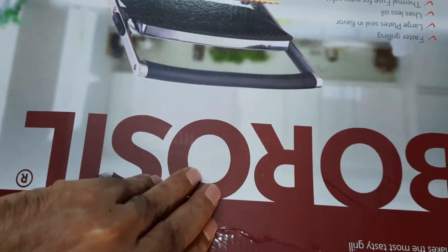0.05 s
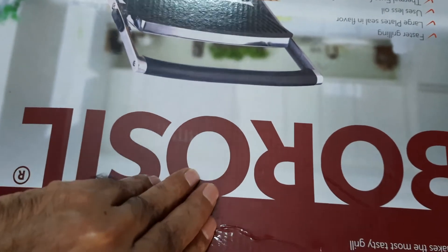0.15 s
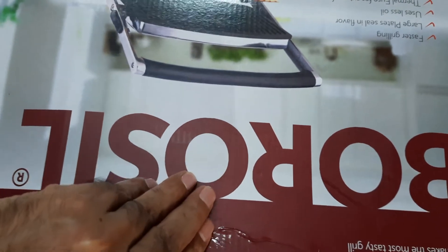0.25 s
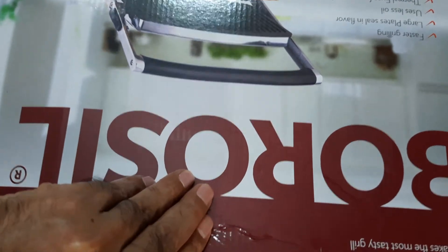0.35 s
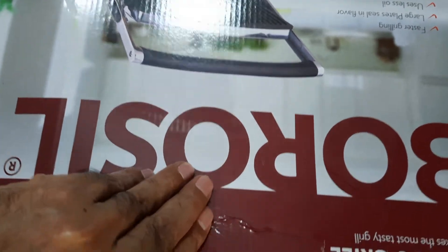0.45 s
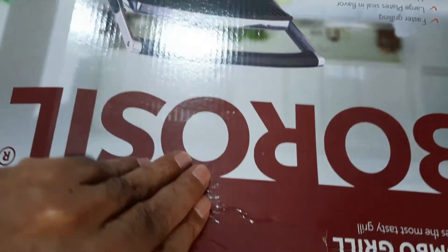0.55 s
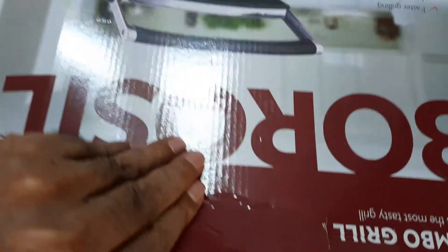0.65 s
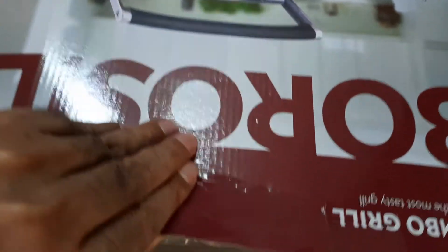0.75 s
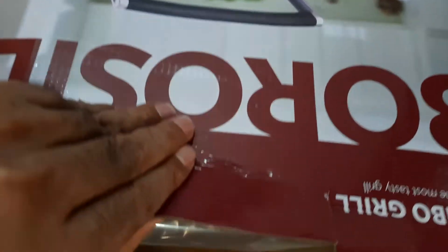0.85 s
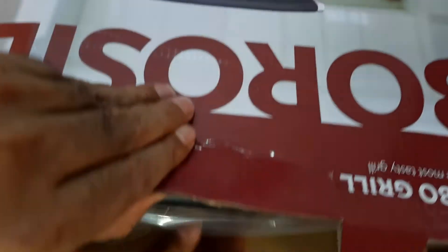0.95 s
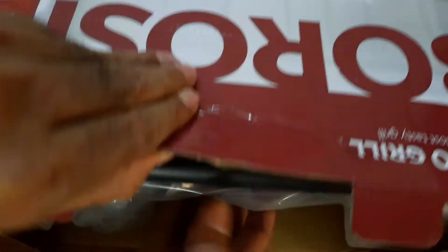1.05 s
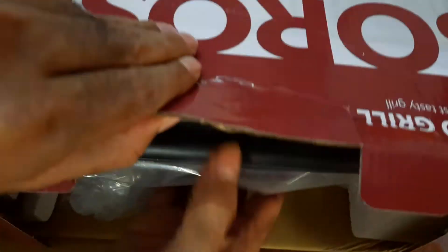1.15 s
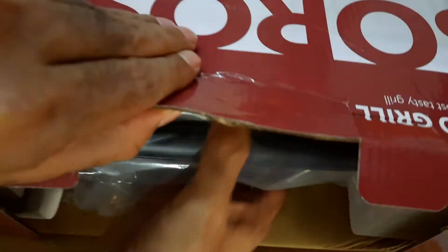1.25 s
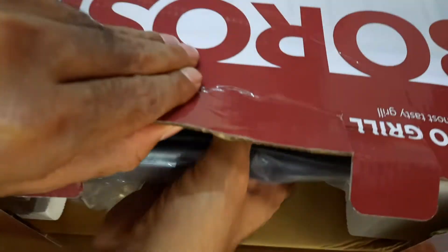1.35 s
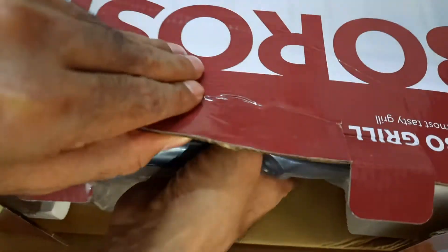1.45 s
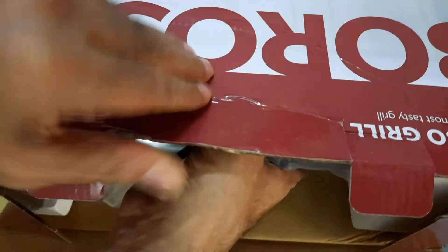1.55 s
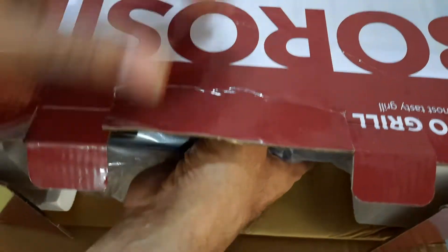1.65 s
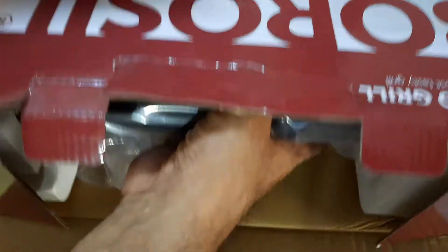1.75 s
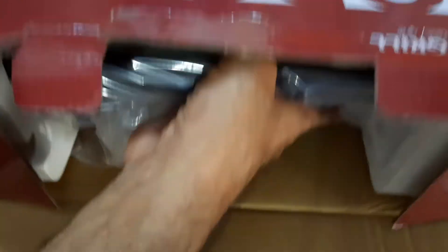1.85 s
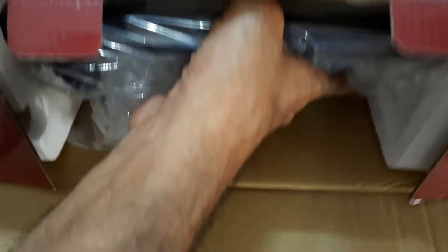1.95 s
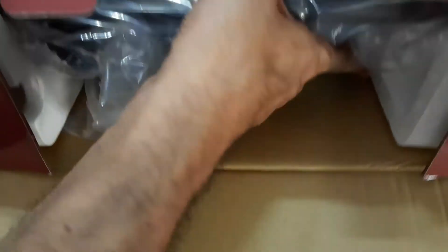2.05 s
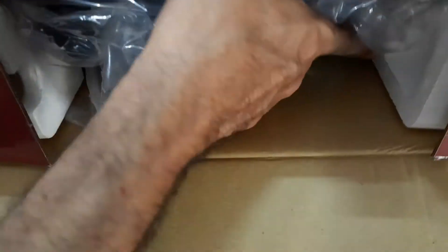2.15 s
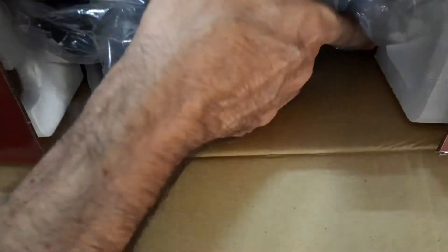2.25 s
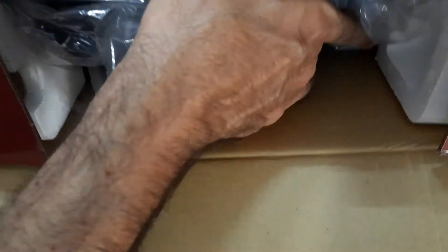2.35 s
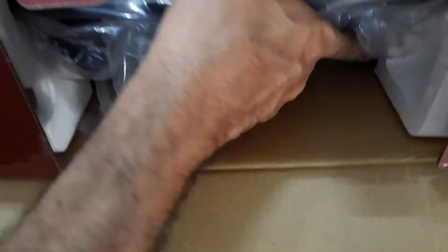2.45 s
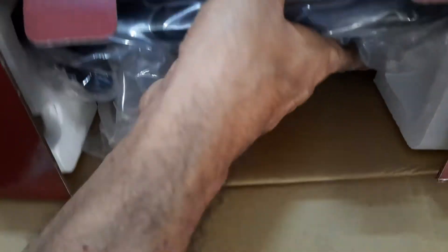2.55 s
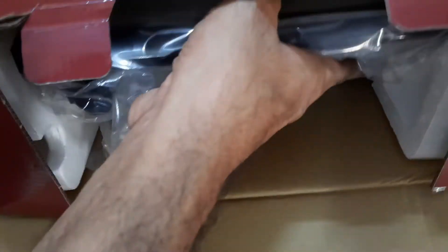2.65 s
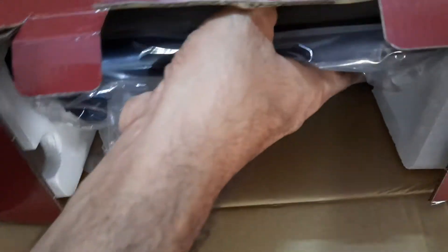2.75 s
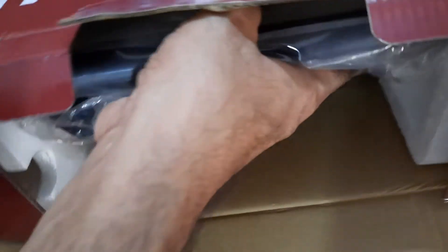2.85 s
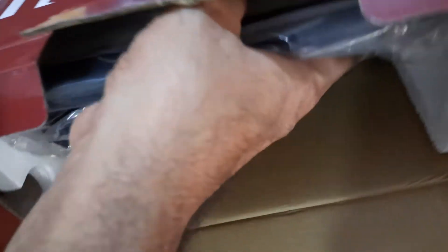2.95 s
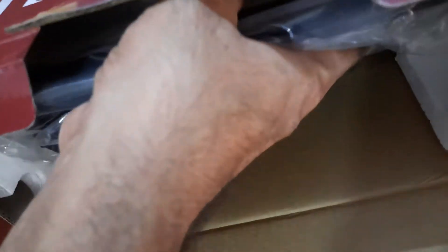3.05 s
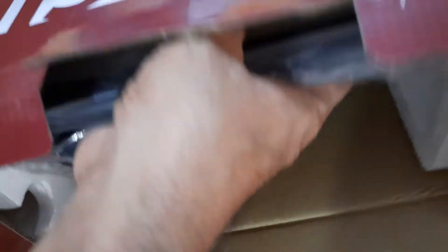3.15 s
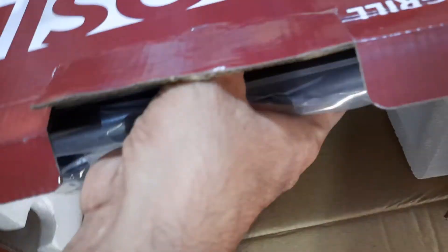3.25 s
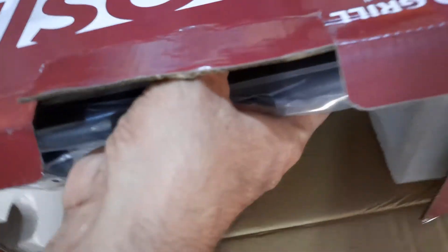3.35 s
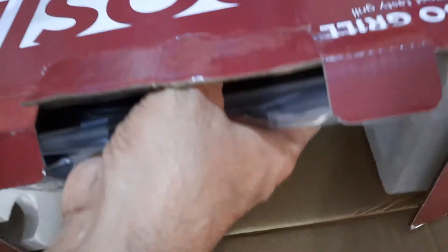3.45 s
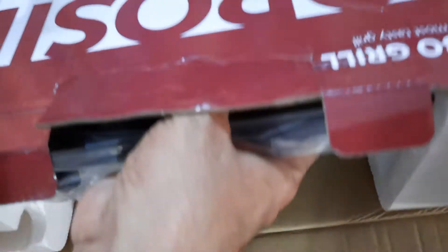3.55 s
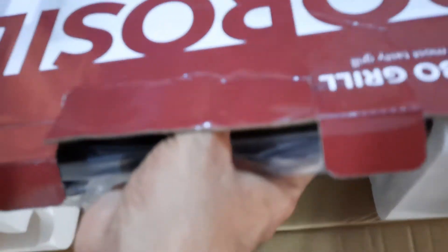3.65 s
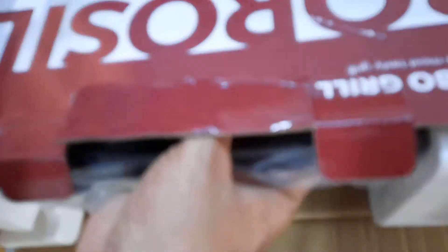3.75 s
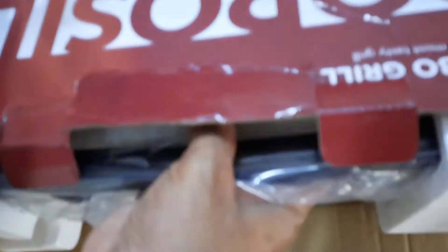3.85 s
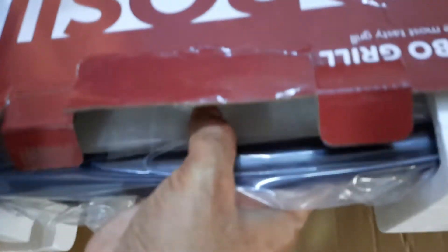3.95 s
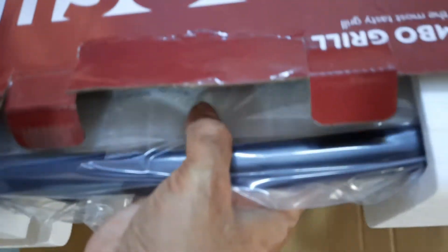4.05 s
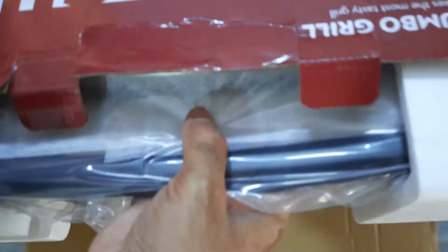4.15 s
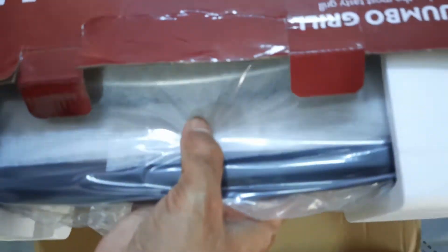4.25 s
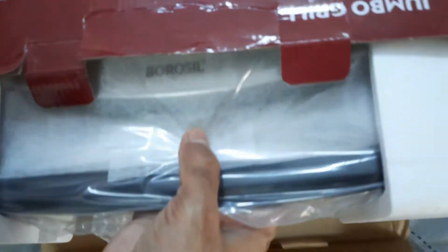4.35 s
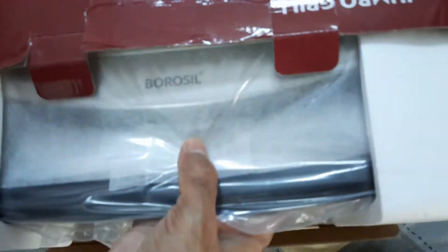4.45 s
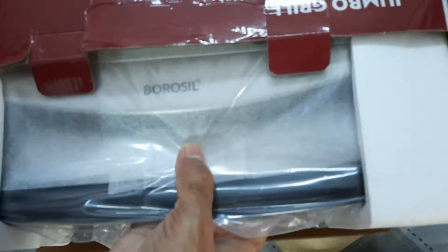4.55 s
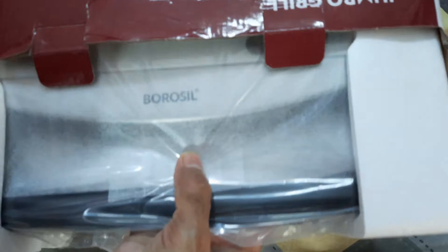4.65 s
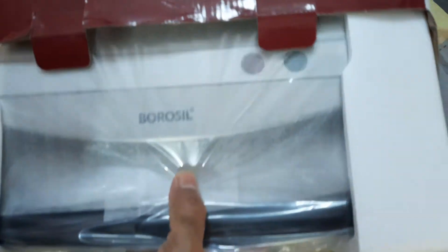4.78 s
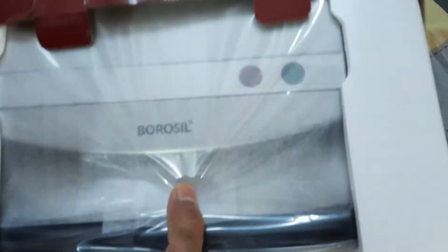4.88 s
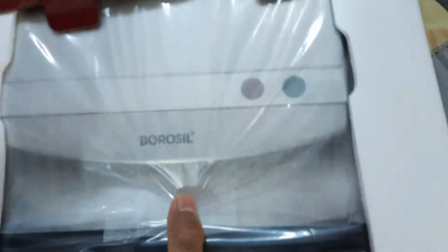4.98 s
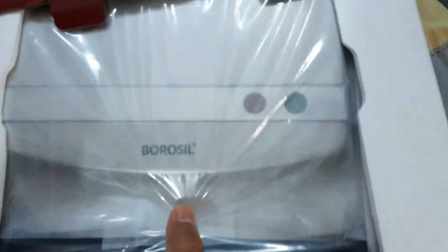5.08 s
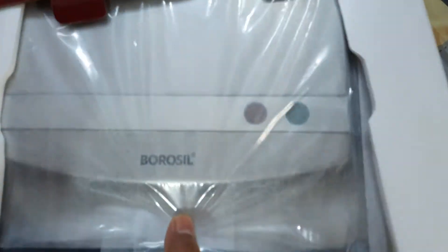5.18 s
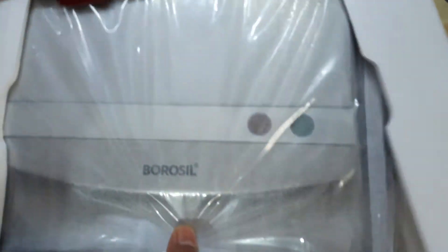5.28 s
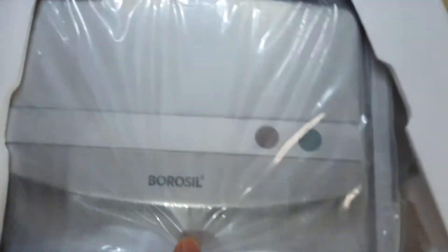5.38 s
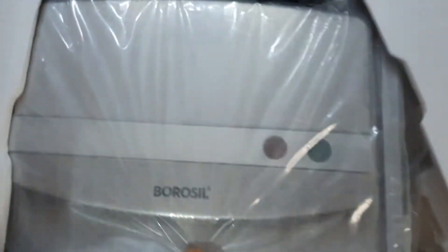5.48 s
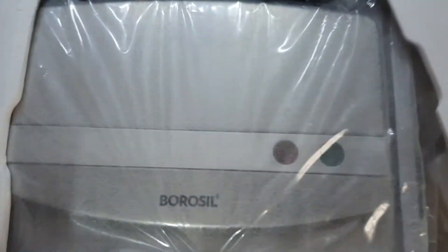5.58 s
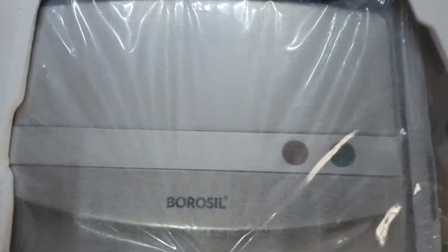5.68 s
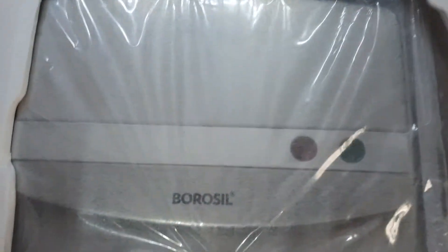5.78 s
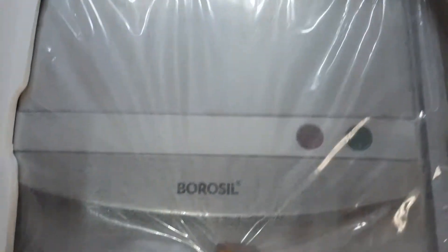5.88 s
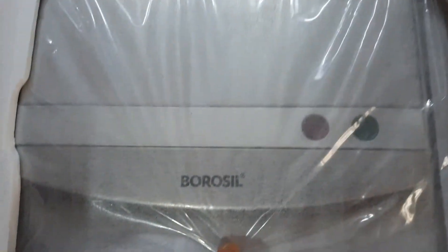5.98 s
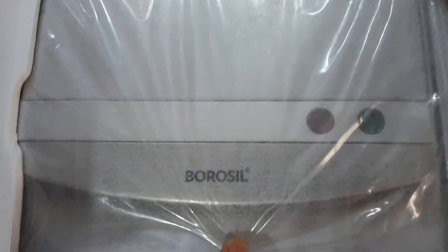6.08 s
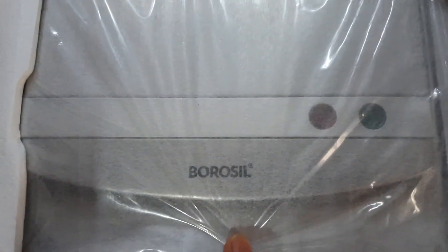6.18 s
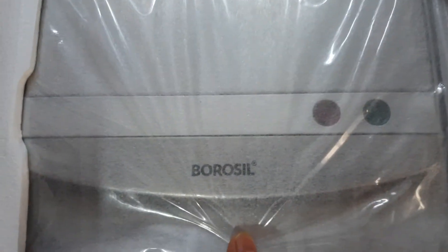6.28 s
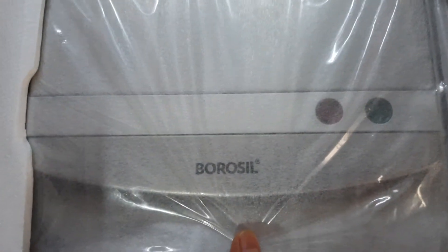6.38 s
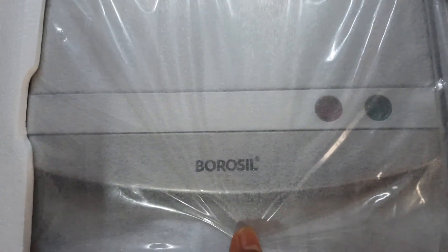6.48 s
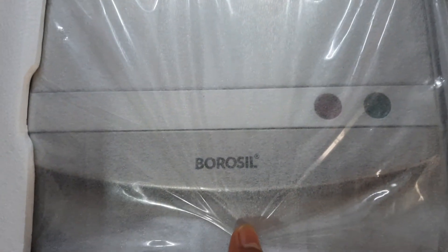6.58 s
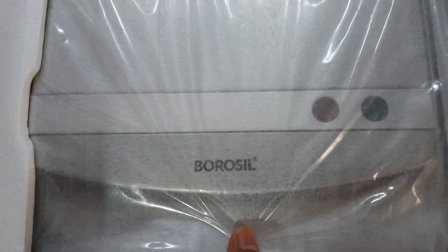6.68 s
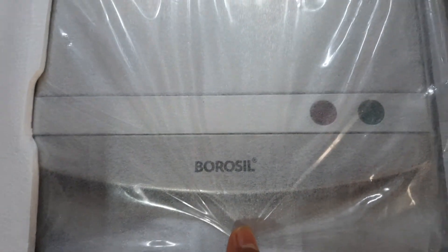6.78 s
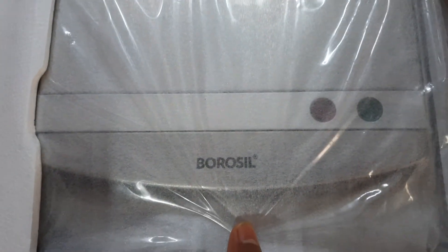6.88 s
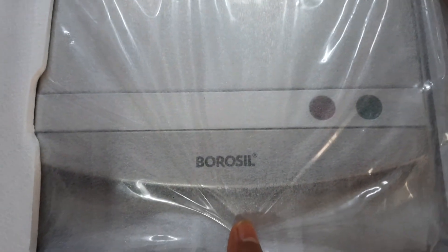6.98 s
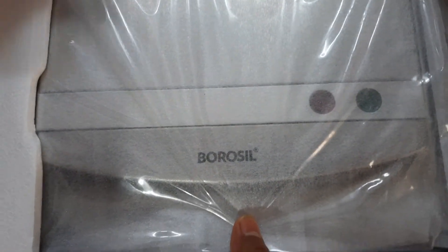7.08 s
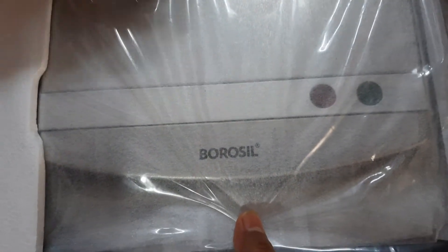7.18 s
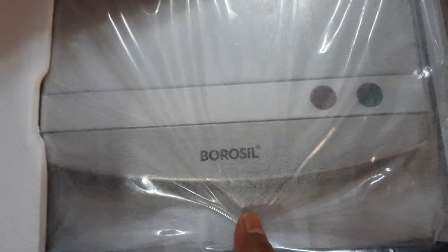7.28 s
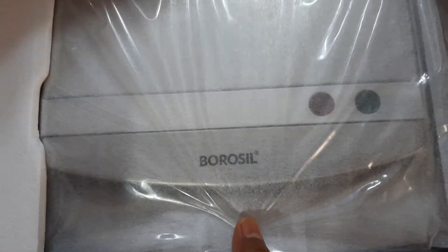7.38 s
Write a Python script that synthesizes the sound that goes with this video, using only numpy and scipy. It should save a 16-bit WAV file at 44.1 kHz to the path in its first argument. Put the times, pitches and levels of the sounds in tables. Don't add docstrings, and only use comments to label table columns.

```python
import sys
import numpy as np
from scipy import signal
from scipy.fft import rfft, irfft
from scipy.io import wavfile

SR = 44100
rng = np.random.default_rng(int(sys.argv[2]) if len(sys.argv) > 2 else 0)


def attenuation_scalar(level_db):
    decades = np.asarray(level_db, float) / 20
    return 10 ** decades


def store_pcm(level_fs):
    pcm = np.round(np.clip(level_fs, -1, 1) * 32767).astype(np.int16)
    wavfile.write(sys.argv[1], SR, np.atleast_2d(pcm).T)


N = 327213

# (frequency [Hz], width [Hz], level [dB])
BOX_MODES = [(182.5, 111, -2.5), (226, 73, 1), (296, 82, -4), (407, 101, -3), (555.5, 131, 3),
             (646, 166, 2.5)]
# (time [s], shake level [dB], hands left-right [dB])
HANDLING = [(0.0, -56.5, -2), (1.27, -50, -1), (1.41, -48.5, 2.5), (1.92, -51, -0.5), (2.14, -54.5, 0.5),
            (2.4, -48.5, 0), (2.78, -50, 0), (3.08, -56, 1), (4.4, -65, 0.5), (4.7, -56, 0),
            (5.52, -50.5, 0), (5.84, -67, 1.5), (5.972, -43.5, -4.5), (6.05, -47.5, -1), (6.232, -76.5, -5),
            (6.734, -58, 4), (7.096, -69, -14), (7.42, -72, -6)]


def rms_one(x):
    return x / np.sqrt(np.mean(x ** 2) + 1e-20)


def left_right(db):
    return attenuation_scalar(db / 2 * np.array([[1], [-1]]))


def in_time(rows):
    times_s, *columns = np.transpose(rows)
    return [np.interp(np.arange(N) / SR, times_s, column) for column in columns]


def at_hz(points):
    grid_hz = np.maximum(np.arange(N // 2 + 1) * SR / N, 1)
    table_hz, values = np.transpose(points)
    return np.interp(np.log(grid_hz), np.log(table_hz), values)


def drift(rate_hz):
    r = np.exp(-80 * np.pi * rate_hz / SR)
    slow = signal.lfilter([1], [1, -2 * r, r * r], rng.standard_normal(N // 40 + 2002))[2000:]
    return np.interp(np.arange(N) / 40, np.arange(len(slow)), rms_one(slow))


def resonance(x, hz, width_hz):
    r = np.exp(-np.pi * width_hz / SR)
    poles = [1, -2 * r * np.cos(2 * np.pi * hz / SR), r * r]
    return signal.lfilter([(1 - r * r) / 2, 0, (r * r - 1) / 2], poles, x)


def panels(x, modes):
    driven = 0
    for k, (hz, width_hz, db) in enumerate(modes):
        driven = driven + attenuation_scalar(db) * (-1) ** k * resonance(x, hz, width_hz)
    return rms_one(driven)


def pair_noise():
    # (frequency [Hz], left-right correlation [-1..1])
    likeness = [(60, 0.81), (250, 0.78), (600, 0.8), (1400, 0), (3100, 0), (15000, 0.0031)]
    mid, side = rfft(rng.standard_normal((2, N)))
    alike = np.clip(at_hz(likeness), -1, 1)
    return irfft(np.sqrt(1 + alike) * mid + np.sqrt(1 - alike) * side * [[1], [-1]], N)


def coloured(x, spectrum):
    closed = [(spectrum[0][0] / 2, -60), *spectrum, (spectrum[-1][0] * 2, -60)]
    return rms_one(irfft(rfft(x) * attenuation_scalar(at_hz(closed)), N))


def knocks():
    # (time [s], peak [dB], panel frequency [Hz], slap over ring [dB])
    blows = [(0.101, -30.5, 261, -18), (0.298, -32.5, 248, -22), (0.312, -22, 1620, -10),
             (0.315, -29.5, 780, -13), (0.32, -33, 242, 6), (0.552, -32, 240, -36),
             (0.682, -29.5, 206, -10), (0.716, -35.5, 530, -22), (0.8235, -12, 530, -14),
             (0.836, -38, 300, -15), (0.866, -36, 457, -11), (1.017, -41, 380, 0), (1.051, -36.5, 226, -22),
             (1.189, -33, 253, 5.5), (1.254, -28.5, 403, -8), (1.3092, -20, 290, -17),
             (1.31, -23, 680, -16), (1.403, -28.5, 180, -1), (1.442, -31.5, 453, -8),
             (1.545, -36, 614, -14), (1.655, -34.5, 235, -23), (1.574, -43, 615, -1),
             (1.789, -20, 548, -6.5), (2.081, -34, 680, 0), (2.112, -38, 786, 2), (2.126, -30.5, 550, -10),
             (2.153, -41, 890, -14), (2.312, -45, 222, 7), (2.402, -49, 744, 1), (2.446, -26, 226, -4),
             (2.667, -30.5, 530, 2), (2.872, -33.5, 480, -6), (2.967, -35.5, 573, -8),
             (3.042, -56, 470, -13), (3.163, -47, 653, -3), (3.673, -35.5, 620, 1), (4.658, -37, 268, -20),
             (5.006, -36.5, 296, -6), (5.966, -33, 935, -11), (5.9705, -28, 213, -9),
             (5.971, -27, 448, -10), (5.993, -35, 205, -10), (6.385, -57.5, 333, -5),
             (6.425, -60, 239, -10), (1.2675, -32, 700, -14), (5.9655, -34, 2350, -20),
             (5.945, -48, 810, 2), (7.1945, -60, 1720, -25)]
    ring_t60_s = 0.041
    damping_per_db, damping_per_octave = 0.08, 0.47
    out, t = np.zeros(N), np.arange(6000) / SR
    rise = 1 - np.exp(-t / 0.0015)
    skin = signal.butter(4, [650, 1500], "band", fs=SR, output="sos")
    for s, peak_db, hz, slap_db in blows:
        t60_s = ring_t60_s * np.exp(-damping_per_db * (peak_db + 32.5)) * (hz / 300) ** -damping_per_octave
        ring = np.sin(2 * np.pi * hz * t) * attenuation_scalar(-60 * t / t60_s)
        octaves_off = np.abs(np.log2(np.array(BOX_MODES)[:, 0] / hz))
        strengths_db = rng.normal(-15, 3, len(BOX_MODES)) - 8 * octaves_off
        for (mode_hz, width_hz, mode_db), strength_db in zip(BOX_MODES, strengths_db):
            decay = np.exp(-.5 * np.pi * width_hz * t)
            ring -= attenuation_scalar(mode_db + strength_db) * np.sin(2 * np.pi * mode_hz * t) * decay
        ring = rise * ring
        slap = signal.sosfilt(skin, rng.standard_normal(len(t)) * np.exp(-t / 0.006))
        knock = ring / np.abs(ring).max() + attenuation_scalar(slap_db) * slap / np.abs(slap).max()
        i = round(s * SR)
        out[i:i + len(t)] += attenuation_scalar(peak_db) * knock[:N - i]
    return out


def thumps():
    # (time [s], peak [dB], frequency [Hz])
    bumps = [(0.102, -51, 107), (0.364, -36, 83), (0.548, -49, 91), (0.682, -42.5, 104), (0.827, -33, 65),
             (1.076, -46, 79.6), (1.255, -37, 50.6), (1.319, -41, 61), (1.393, -37.5, 76.4),
             (1.3, -43, 110), (1.787, -39, 115), (1.795, -41, 58), (2.45, -46, 96), (2.669, -53, 70.0),
             (2.929, -58, 51.1), (3.199, -54, 77), (4.33, -48, 70.4), (4.41, -57, 75), (3.33, -57, 70),
             (5.661, -54, 142), (6.69, -55, 80.5), (6.78, -58, 80)]
    out, t = np.zeros(N), np.arange(6000) / SR
    swell = (t / 0.013) * np.exp(1 - t / 0.0084)
    for s, db, hz in bumps:
        i = round(s * SR)
        out[i:i + len(t)] += attenuation_scalar(db + 5.5) * np.sin(2 * np.pi * hz * t) * swell
    return out


def snaps():
    # (time [s], level [dB], centre [Hz], dull push [dB])
    crease_snaps = [(0.686, -32.5, 6400, -23), (0.689, -35.5, 5000, -16), (0.73, -30, 6600, -6.5),
                    (1.0076, -44, 3370, 5), (1.029, -42, 3600, -17), (1.1019, -28, 2930, -14),
                    (1.134, -31.5, 5470, -3), (1.1577, -34, 4670, -21), (1.1712, -26, 5700, -10),
                    (1.193, -19.5, 4600, -5.5), (1.2222, -26, 3900, -5), (1.2543, -38, 4200, 1),
                    (1.303, -29.5, 6160, -16), (1.336, -38, 4300, -8), (1.3446, -34, 5400, -14),
                    (1.353, -25.5, 6750, -3.5), (1.368, -36, 4400, 5), (1.3894, -28, 4380, -0.5),
                    (1.394, -33, 4450, -2.5), (1.3982, -27.5, 4350, -21), (1.466, -34, 4100, -19),
                    (1.5483, -30, 4800, 1), (1.574, -28.5, 4670, 0.5), (1.586, -34, 4400, -7),
                    (1.618, -38, 5000, -9), (1.657, -29.5, 5100, -5), (1.69, -33, 4900, -19),
                    (1.6936, -32, 4200, -1), (1.738, -39.5, 4200, -16),
                    (1.7762, -18.5, 4900, -11), (1.808, -32, 3850, -8), (1.8526, -25.5, 5200, -6),
                   (1.8674, -32.5, 5600, 1), (1.8785, -40.5, 4900, 8), (1.924, -43, 4800, 8),
                   (1.963, -34.5, 4700, -6), (1.989, -28.5, 4850, -17), (2.0042, -29, 3300, -2.5),
                   (2.039, -34, 4860, -8), (2.0683, -35.5, 3920, 0), (2.0975, -33.5, 3700, -4),
                   (2.109, -24.5, 6440, -26), (2.1267, -27, 4700, -22), (2.131, -13.5, 3770, -24),
                   (2.1562, -32.5, 4500, -3), (2.2668, -33, 3040, -11), (2.272, -39, 3700, -8),
                   (2.3146, -26, 6760, -13), (2.3697, -37, 4900, -4), (2.38, -33.5, 4130, -29),
                   (2.4066, -39, 4700, 4), (2.417, -26.5, 4370, -9), (2.4328, -23.5, 6500, -4.5),
                   (2.4435, -20, 3280, -20), (2.4612, -46, 8000, 9), (2.481, -31, 6100, -22),
                    (2.51, -21, 9050, -11), (2.5229, -21, 8050, -13), (2.532, -19, 5270, -18),
                  (2.541, -31, 5100, -14), (2.5586, -32, 4400, -5), (2.6247, -29, 4900, -19),
                  (2.6538, -37.5, 4560, 3), (2.678, -28.5, 4030, -3.5), (2.728, -35.5, 3900, 5),
                  (2.7484, -26, 5370, -9), (2.7693, -22.5, 5660, -6.5), (2.7815, -22, 5930, -10.5),
                  (2.7853, -31, 5300, -16), (2.8504, -33.5, 6400, -7), (2.9013, -39, 2680, 4.5),
                  (2.912, -37, 4600, -17), (2.93, -27.5, 4120, -13), (2.938, -30, 6030, -6),
                  (2.9903, -37, 4500, -5), (2.9996, -36, 5000, -17), (3.046, -38.5, 4060, -2.5),
                  (3.132, -51, 4430, -23), (3.161, -46, 4660, -0.5), (3.2085, -52, 3100, 9),
                  (3.345, -28.5, 5400, -10), (3.361, -29.5, 2220, -0.5), (3.4136, -26, 5170, -32),
                  (3.504, -27, 4970, -13), (3.6, -33, 4500, -10),
                    (1.2115, -31, 6000, -4), (1.2675, -54, 2500, 5), (1.2975, -47, 2300, 0),
                   (1.4218, -37.5, 7000, 8), (1.4418, -35, 2880, 2), (1.5095, -42, 4940, 1),
                   (1.529, -49, 5440, -6), (1.717, -36, 4500, 2.5), (1.727, -40, 5500, -1),
                   (1.762, -33, 6800, -7), (1.840, -39, 7650, -14), (1.897, -45, 3000, 6),
                   (1.938, -37, 5000, 5), (2.0165, -36, 7000, 0), (2.0255, -37, 7000, -5),
                   (2.082, -38, 5500, 5), (2.203, -44, 2400, -8), (2.3202, -38, 3500, -1),
                   (2.403, -35.5, 2500, 5.5), (2.4475, -32, 2800, -5), (2.4526, -34, 2600, 6),
                   (2.636, -44, 4500, 1), (2.697, -38, 4500, 6.5), (2.7512, -34, 6500, -14),
                   (2.3745, -41, 5400, 1), (2.5255, -26, 3500, -7), (2.5847, -32.5, 6000, 0.5),
                   (2.670, -43, 7000, -10), (2.7165, -43, 6430, 1), (2.885, -47.5, 3500, 11),
                   (3.052, -45, 2530, -8), (3.2435, -66, 2430, 0), (3.3095, -50, 7700, -2),
                   (3.3325, -42, 2400, 6.5), (1.2865, -47, 4900, -8), (1.1825, -39, 4000, 0),
                   (2.311, -40, 2500, 1), (2.4675, -38, 9000, -12), (2.4945, -38, 7000, -8),
                    (0.1, -40.5, 6400, -17), (0.826, -42, 12000, -29), (0.141, -57, 6800, -15),
                  (0.2014, -49.5, 7940, -17), (0.492, -57, 3800, 5), (0.605, -51, 7100, -12),
                  (0.6544, -49.5, 3200, 10), (0.9675, -60, 7200, -5.5), (6.345, -59, 5000, -7),
                  (5.132, -35.5, 6000, -17), (5.465, -33, 8160, -20), (5.9655, -37.5, 2360, 5),
                  (6.021, -52, 6200, -20), (6.89, -50, 6800, -17), (7.022, -47.5, 3850, -8.5),
                  (7.147, -52.5, 4800, -13), (7.22, -59, 7000, -20), (7.1937, -34.5, 8150, -33)]
    peel_times = [1.193, 1.2115, 1.303, 1.7764, 2.4068, 2.417, 2.4327, 2.4436, 2.481, 2.3146]
    peel_s = 0.0016
    port_lag_samples, alike = 3, 0.6
    out, t = np.zeros((2, N)), np.arange(-130, 900) / SR
    after = np.maximum(t, 0)
    creak = 0.02 * np.exp(np.minimum(t, 0) / 0.0013)
    tick_and_rattle = np.exp(-after / 0.00043) + 0.37 * np.exp(-(after / 0.0024) ** 2)
    sudden = np.where(t < 0, creak, tick_and_rattle)
    swell = np.exp(-((t - .001) / peel_s) ** 2) + .1 * np.exp(-np.abs(t) / .004)
    dull = signal.butter(2, [500, 2200], "band", fs=SR, output="sos")
    push_shape = (t > 0) * np.exp(-after / 0.0046)
    for s, db, hz, dull_db in crease_snaps:
        pan_db = np.interp(s, *np.transpose(HANDLING)[::2]) + rng.normal(1.0, 2.8)
        shape = swell if np.abs(s - np.array(peel_times)).min() < .003 else sudden
        top_hz = np.clip(12500 + 400 * (db + 20), 6500, 15000)
        bright = signal.butter(1, [.45 * hz, top_hz], "band", fs=SR, output="sos")
        near, other = rng.standard_normal((2, len(t)))
        far = alike * np.roll(near, port_lag_samples) + np.sqrt(1 - alike ** 2) * other
        noise = np.array([near, far])
        tick = signal.sosfilt(bright, noise * shape) + 2.0 * resonance(noise * shape, hz, 0.3 * hz)
        push = signal.sosfilt(dull, (noise + 2.0 * noise[::-1]) * push_shape)
        snap = rms_one(tick) + attenuation_scalar(dull_db - 1.0) * rms_one(push)
        i = round((s + t[0]) * SR)
        out[:, i:i + len(t)] += (attenuation_scalar(db - 11.5) * left_right(pan_db) * snap)[:, :N - i]
    return out


def friction_db():
    # (time [s], hiss [dB], card scrape over hiss [dB])
    brushes = [(0.0, -53, 9.5), (.06, -61, 4), (.12, -62, 6), (.207, -67, 0), (0.313, -38, 5.5),
               (0.527, -56.5, -1), (0.611, -57, -4), (.66, -58.5, 3), (.692, -53, 3), (0.737, -41, -12),
               (.79, -58, -21), (.835, -49.5, -26), (.875, -57, -16), (.975, -64, -3), (1.02, -52, 0),
               (3.13, -65, 4), (3.204, -59.5, 10), (3.25, -83, 3), (3.32, -57, 5.5), (3.362, -51.5, 8.5),
               (5.978, -46.5, -1), (5.92, -54.5, -15), (6.03, -53, 2), (6.08, -56.5, -0.5),
               (6.2, -66.5, -1.5), (6.38, -76, -3), (6.425, -61.5, -9), (6.47, -59.5, -12),
               (6.945, -58, -11), (6.985, -59.5, -19), (7.36, -72, -19.5), (7.06, -69.5, -7),
               (7.2, -61, -7)]
    # (up to speed [s], length [s], hiss [dB], end hiss [dB], card scrape over hiss [dB])
    slides = [(3.503, 0.29, -39, -50.5, 1), (3.78, 0.097, -35, -34.5, -18), (3.8, 0.63, -31.5, -34.5, -11),
              (4.46, 0.14, -37.5, -43, -6.5), (4.67, 0.34, -32, -29.5, -15.5), (3.639, 2.09, -51, -60, 10),
              (5.5, 0.075, -50, -41.5, -22), (5.235, 0.38, -37.5, -42.5, -8.5),
              (5.62, 0.088, -44.5, -44, -24), (6.85, 0.1, -70, -61.5, -5),
              (6.69, 0.072, -35.5, -35.5, -10.5)]
    # (time [s], hiss [dB])
    groping = [(1.04, -54.5), (1.165, -51), (1.36, -44), (1.49, -49), (1.58, -45.5), (1.97, -47.5),
               (2.16, -52), (2.25, -54), (2.32, -54), (2.395, -60), (2.41, -42.5), (2.55, -45),
               (2.8, -52.5), (2.95, -56.5), (3.035, -64.5), (3.05, -57), (3.07, -54.5), (3.09, -72)]
    groping_scrape_db, still_db = 2.5, -74.5
    rise_db_per_s, fall_db_per_s, slide_fall_db_per_s = 351.5, 217, 200
    speed_up_s, speed_power = 0.17, 1.53
    t = np.arange(N) / SR
    groping_db, = in_time(groping)
    outside_s = np.maximum(0, np.maximum(groping[0][0] - t, t - groping[-1][0]))
    strokes = [(groping_db - fall_db_per_s * outside_s, groping_scrape_db)]
    for s, db, card_db in brushes:
        drop_db = np.where(t < s, rise_db_per_s * (s - t), fall_db_per_s * (t - s))
        strokes.append((db - drop_db, card_db))
    for s, length_s, db, end_db, card_db in slides:
        speed = np.clip(1 + (t - s) / speed_up_s, 1e-4, 1)
        fall_db = slide_fall_db_per_s * np.maximum(t - s - length_s, 0)
        steady_db = np.interp(t, [s, s + length_s], [db, end_db])
        strokes.append((steady_db + speed_power * 20 * np.log10(speed) - fall_db, card_db))
    hiss = attenuation_scalar(still_db) ** 2 + sum(attenuation_scalar(db) ** 2 for db, _ in strokes)
    scrape = sum(attenuation_scalar(db + card_db) ** 2 for db, card_db in strokes)
    return 10 * np.log10(hiss), 10 * np.log10(scrape + 1e-10)


def crinkle(share, per_s, spread_db, burst_s):
    sizes = attenuation_scalar(spread_db * np.minimum(rng.exponential(1, N), 2.5))
    slips = sizes * (rng.random(N) < per_s * attenuation_scalar(3.5 * drift(15)) / SR)
    bursts = rms_one(signal.lfilter([1], [1, -np.exp(-1 / (burst_s * SR))], slips))
    share = np.clip(share, 0, 1)
    return np.sqrt(1 - share + share * bursts ** 2)


def film_hiss(share):
    # (frequency [Hz], density [dB/Hz])
    hiss_spectrum = [(2000, -21), (2500, -11.5), (3350, -8.5), (5500, -3.5), (7000, -8), (9300, -16.5),
                     (12900, -10.5), (16000, -11)]
    # (low [Hz], high [Hz])
    film_bands = [(1000, 3000), (3000, 5500), (5500, 9500), (9500, 20000)]
    # (frequency [Hz], width [Hz], gain [dB])
    foam_modes = [(4900, 2750, -3.5), (13700, 5900, 4), (1330, 200, -1)]
    # (deepest at [s], frequency [Hz], width [Hz], gain [dB])
    hollow = [
        (3.9, 3350, 700, -6),
        (4.6, 3350, 700, -15),
        (5.4, 3480, 700, -3),
        (6.7, 3570, 900, -2.5),
    ]
    # (highest at [s], frequency [Hz], width [Hz], gain [dB])
    ridge = [
        (3.9, 2750, 400, 4),
        (4.6, 2400, 350, 8.5),
        (5.4, 2400, 400, 0),
    ]
    white = [coloured(pair_noise(), hiss_spectrum) for _ in range(2)]
    together = crinkle(0.98 * share, per_s=270, spread_db=6.5, burst_s=0.0012)
    out = 0
    for k, edges_hz in enumerate(film_bands):
        band = signal.sosfilt(signal.butter(2, edges_hz, "band", fs=SR, output="sos"), white[k % 2])
        own = crinkle(0.26 * share, per_s=210, spread_db=1.5, burst_s=0.0022)
        out = out + band * together * own * attenuation_scalar((0.8 + 2.4 * share) * drift(14))
    top = signal.sosfilt(signal.butter(2, 9500, "high", fs=SR, output="sos"), out)
    out = out - np.clip(3.7 * share, 0, .72) * top
    sliding = np.clip(1 - 4 * share, 0, 1)
    for moving in (hollow, ridge):
        times_s = np.array(moving)[:, 0]
        for (_, hz, width_hz, db), here in zip(moving, np.eye(len(moving))):
            depth = np.interp(np.arange(N) / SR, times_s, here)
            out = out + sliding * depth * (attenuation_scalar(db) - 1) * resonance(out, hz, width_hz)
    for hz, width_hz, db in foam_modes:
        out = out + sliding * (attenuation_scalar(db) - 1) * resonance(out, hz, width_hz)
    return out


def rubbing():
    # (time [s], share [0-1])
    crinkle_share = [
        (0, 0.26),
        (0.92, 0.07),
        (1.05, 0.82),
        (3.0, 0.74),
        (3.38, 0.93),
        (3.44, 0.05),
        (7.42, 0.06),
    ]
    # (frequency [Hz], density [dB/Hz])
    scrape_spectrum = [(600, -28), (850, -9.5), (1150, -2), (1850, -3), (2450, -2), (3200, -10),
                       (4500, -12)]
    # (frequency [Hz], density [dB/Hz])
    shut_spectrum = [(500, -28), (750, -11), (1250, -13), (1620, -2), (2050, 1), (2500, -3), (3600, -13.5)]
    # (frequency [Hz], density [dB/Hz])
    rumble_spectrum = [(25, -21.5), (45, -4.5), (70, 8), (110, -0.5), (160, -3.5), (250, 9)]
    opens_s = 0.66
    hiss_db, scrape_db = friction_db()
    share, = in_time(crinkle_share)
    boom_db, pan_db = in_time(HANDLING)
    flap_db = scrape_db - 15 + 17 * share
    rumble_db = -65.5 + (boom_db + 54.5)
    rub = pair_noise() * crinkle(share, per_s=300, spread_db=4.0, burst_s=0.0021)
    shut = np.arange(N) < opens_s * SR
    card = np.where(shut, coloured(rub, shut_spectrum), coloured(rub, scrape_spectrum))
    hiss = attenuation_scalar(hiss_db) * film_hiss(share)
    scrape = attenuation_scalar(scrape_db + 0.6 * drift(17)) * card
    flaps = attenuation_scalar(flap_db + 2.5 * drift(10)) * panels(rub, BOX_MODES[3:])
    boom = attenuation_scalar(boom_db + 3.0 * drift(14)) * panels(pair_noise(), BOX_MODES[:3])
    rumble = attenuation_scalar(rumble_db + 1.5 * drift(4.6)) * coloured(pair_noise(), rumble_spectrum)
    return (hiss + scrape) * left_right(pan_db) + flaps + boom + rumble


def air_gap():
    # (time [s], resonance [Hz], level [dB])
    gap = [
        (3.3, 1220, -63),
        (3.338, 1126, -41),
        (3.796, 1194, -34.5),
        (4.128, 1164, -43.5),
        (4.6, 1445, -62),
    ]
    hz, db = in_time(gap)
    inside = np.interp(np.arange(N) / SR, [3.3, 3.45, 4.3, 4.6], [0, 1, 1, 0])
    lowpass = signal.butter(2, 150, fs=SR, output="sos")
    band = rms_one(signal.sosfilt(lowpass, rng.standard_normal((2, 2, N))))
    phase = 2 * np.pi * np.cumsum(hz) / SR
    return inside * attenuation_scalar(db - 7.5) * (band[0] * np.cos(phase) + band[1] * np.sin(phase))


def squeak():
    # (start [s], length [s], from [Hz], to [Hz], level [dB])
    settling = (6.31, 0.085, 4800, 5250, -75)
    s, length_s, from_hz, to_hz, db = settling
    done = np.clip((np.arange(N) / SR - s) / length_s, 0, 1)
    phase = 2 * np.pi * np.cumsum(from_hz + (to_hz - from_hz) * np.sqrt(done)) / SR
    return attenuation_scalar(db) * np.sqrt(np.sin(np.pi * done).clip(0)) * np.sin(phase)


def room(x, t60_s):
    t = np.arange(round(.3 * SR)) / SR
    tail = rng.standard_normal((2, len(t))) * attenuation_scalar(-60 * t / t60_s) * (1 - np.exp(-t / 0.0031))
    tail = signal.lfilter([1], [1, -.4], tail)
    return signal.fftconvolve(x, tail / np.sqrt(np.sum(tail ** 2) / 2), axes=1)[:, :N]


def room_tone():
    # (frequency [Hz], density [dB/Hz])
    tone_spectrum = [(24, -52.5), (40, -12), (81, 15), (180, -3), (220, 9.5), (372, -9.5), (873, -30),
                     (1590, -4), (2630, -22.5), (7930, -13.5), (16000, -59)]
    # (frequency [Hz], left-right [dB])
    room_side = [(2000, 0), (4500, -5), (8000, -4), (10500, -9), (16000, -7)]
    tone = attenuation_scalar(-65 + 2.8 * drift(4.6)) * coloured(pair_noise(), tone_spectrum)
    return irfft(rfft(tone) * left_right(at_hz(room_side)), N)


def scene():
    blows, creases = knocks(), snaps()
    blow_tail = room(attenuation_scalar(-12.5) * blows[None], t60_s=0.35)
    blow_tail = blow_tail + 0.58 * blow_tail[::-1]
    crease_tail = attenuation_scalar(-17) * room(creases, t60_s=.08)
    hits = blows + blow_tail + thumps() + creases + crease_tail
    return hits + rubbing() + air_gap() + squeak() + room_tone()


def roll_off(x):
    return signal.sosfilt(signal.butter(12, 16990, fs=SR, output="sos"), x)


def record(dry):
    # (frequency [Hz], width [Hz], gain [dB])
    port = (7870, 750, 8.46)
    # (frequency [Hz], left-right [dB])
    sidedness = [(60, 4), (2500, 3), (5200, -0.5), (6600, 1), (8200, 6.5), (10200, -10), (12400, -4.5),
                 (16000, 2)]
    hz, width_hz, db = port
    ported = dry + (attenuation_scalar(db) - 1) * resonance(dry, hz, width_hz)
    ported = signal.sosfilt(signal.butter(2, 36, "high", fs=SR, output="sos"), ported)
    ported = .95 * np.tanh(ported / .95)
    tilted = irfft(rfft(ported) * left_right(at_hz(sidedness)), N)
    top_cut = signal.cheby2(16, 38, 16150, fs=SR, output="sos")
    return roll_off(signal.sosfilt(top_cut, tilted))


dry = scene()
out = record(dry)
store_pcm(out)
```